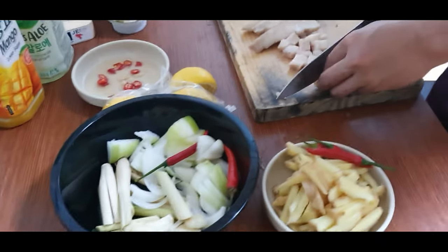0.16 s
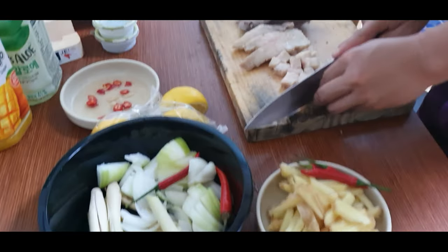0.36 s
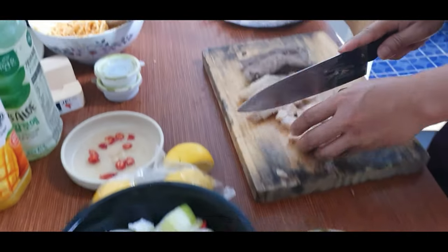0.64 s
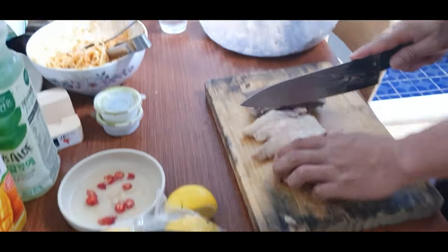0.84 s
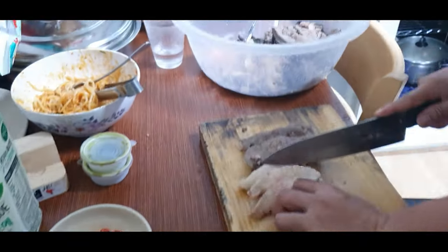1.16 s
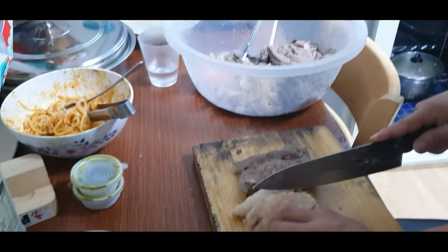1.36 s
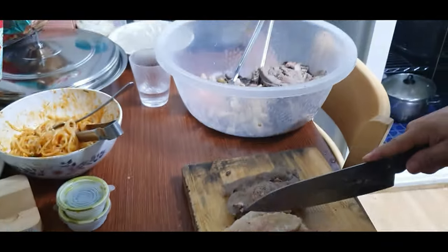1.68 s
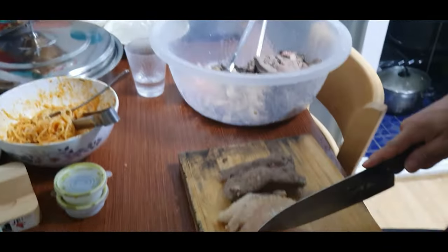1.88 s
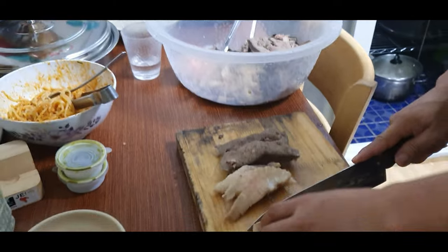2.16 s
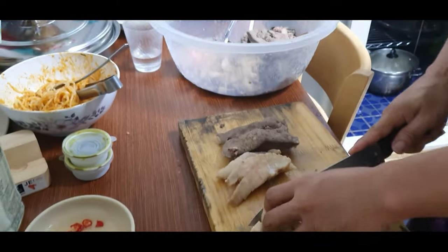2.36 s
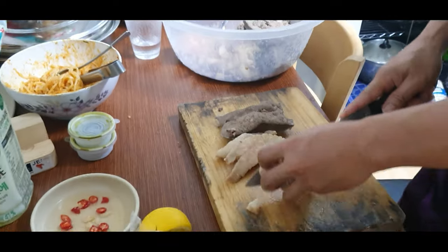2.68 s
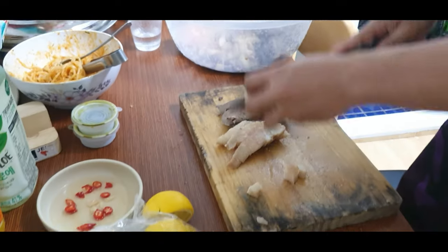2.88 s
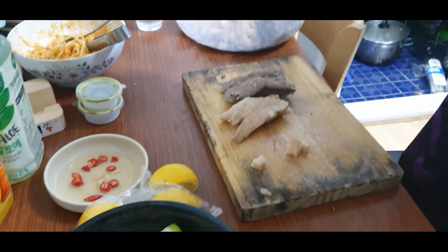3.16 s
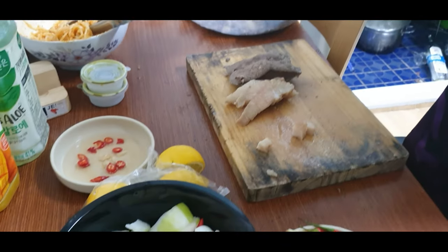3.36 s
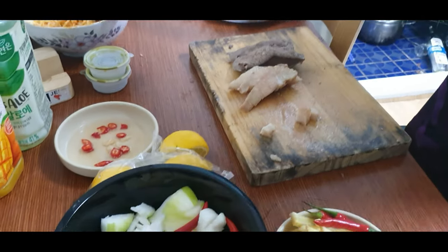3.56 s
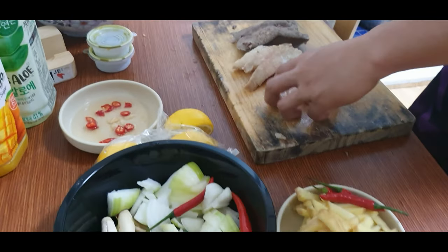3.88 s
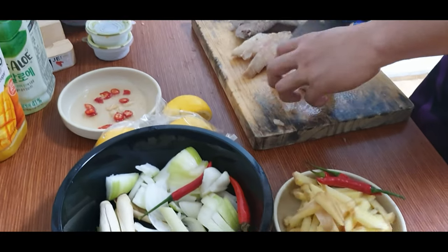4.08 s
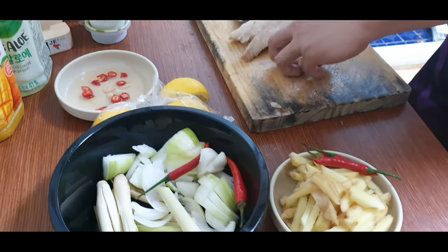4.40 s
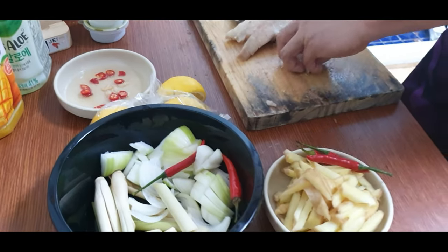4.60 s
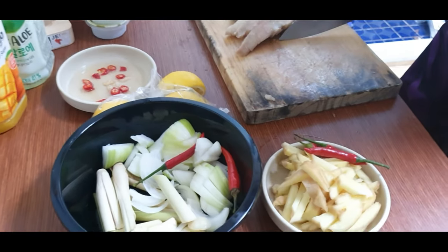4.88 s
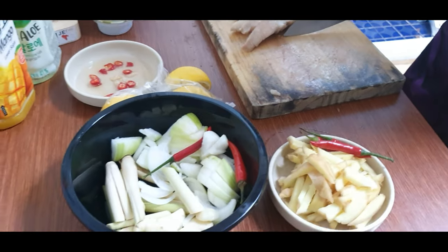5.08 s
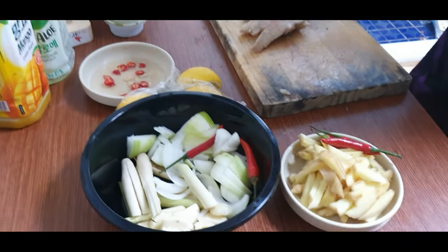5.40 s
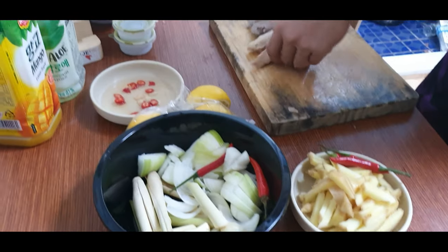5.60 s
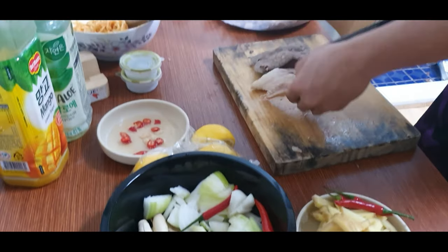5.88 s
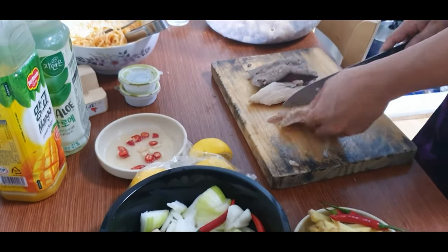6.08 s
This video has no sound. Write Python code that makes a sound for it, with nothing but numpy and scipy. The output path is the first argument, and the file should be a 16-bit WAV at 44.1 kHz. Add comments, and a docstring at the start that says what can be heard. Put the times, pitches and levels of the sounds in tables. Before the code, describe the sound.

Close stereo capture in a hard-walled kitchen with a steady low refrigerator hum and soft room air. A bright blade tap leads into one heavy, woody chop, followed by a short metallic drag and a soft slide. Afterwards come sparse steel taps, faint treble rustles and dull knocks, the later taps brighter and more echoing.

```python
"""Close in a hard-walled kitchen a refrigerator hums throughout, over room air and a faint narrow whine.
Bright blade taps come first, then one heavy chop on a wooden board, a drag of the blade and a soft slide;
room noise swells around the chop. Faint treble rustles, a second slide, dull knocks and taps follow.
Taps are echo clouds of coloured noise, knocks add ringing board modes, drag and slides are resonant noise;
the refrigerator is a set of wavering sines, the rustles, the air and the whine are filtered noise."""
import sys
import numpy as np
from scipy import signal
from scipy.fft import rfft, irfft
from scipy.io import wavfile

SR = 44100
rng = np.random.default_rng(int(sys.argv[2]) if len(sys.argv) > 2 else 0)


def waveform_to_disk(signal):
    """Save audio, clipped to [-1, 1], as 16-bit WAV at the path in sys.argv[1]."""
    frames = np.transpose(np.atleast_2d(signal))
    scaled = np.clip(frames, -1, 1) * 32767
    samples = np.round(scaled).astype(np.int16)
    wavfile.write(sys.argv[1], SR, samples)


N = 275184
EVENT_SIZE = 16384   # samples kept of each tap, knock or rustle


def from_db(db):
    """Decibels to gain."""
    return 10 ** (np.asarray(db) / 20)


def in_time(rows):
    """Columns of a curve table, joined by straight lines, at every sample."""
    s, *columns = np.transpose(rows)
    return [np.interp(np.arange(N) / SR, s, column) for column in columns]


def at_hz(points, hz):
    """A spectrum table read on a log-frequency axis."""
    table_hz, values = np.array(points).T
    return np.interp(np.log(hz), np.log(table_hz), values)


def drift(rate_hz):
    """Random wander: straight lines between normal draws of spread 1, rate_hz draws a second."""
    knots = rng.standard_normal(int(N / SR * rate_hz) + 2)
    return np.interp(np.arange(N) * rate_hz / SR, np.arange(len(knots)), knots)


def split(x, centres_hz):
    """Overlapping frequency slices of x that add up to x."""
    hz, spectrum = np.maximum(np.fft.rfftfreq(N, 1 / SR), 1), rfft(x)
    return [irfft(spectrum * at_hz(list(zip(centres_hz, one)), hz), N) for one in np.eye(len(centres_hz))]


def humps(rings, hz, lift_db):
    """Power gain of resonances on a flat base; lift_db raises every ring's tabled level."""
    gain = 1
    for centre_hz, width_hz, db in rings:
        gain = gain + from_db(2 * (db + lift_db)) / (1 + (2 * (hz - centre_hz) / width_hz) ** 2)
    return gain


def diffuse(size, gain_at):
    """Stereo noise from all sides at rms 1, coloured by gain_at(Hz), its channels alike by frequency."""
    # likeness of the two microphones' noise: hz, correlation (1 alike, 0 unlike, -1 opposed)
    likeness = [(60, 0.8), (120, 1), (240, 0.45), (480, 0.26), (950, -0.56), (1890, -0.22), (3770, 0.071),
                (7520, 0.056), (15000, -0.057)]
    # balance of the microphones: hz, left_right_db
    balance = [(100, 2), (500, -1), (1500, 2), (3000, 5), (5000, 8.5), (8000, 5), (15000, 0)]
    hz = np.maximum(np.fft.rfftfreq(size, 1 / SR), 1)
    alike = np.clip(at_hz(likeness, hz), -1, 1)
    mid, side = rfft(rng.standard_normal((2, size))) * gain_at(hz)
    pair = np.sqrt(1 + alike) * mid + np.sqrt(1 - alike) * side * [[1], [-1]]
    noise = irfft(pair * from_db(at_hz(balance, hz) * [[.5], [-.5]]), size)
    return noise / np.sqrt(np.mean(noise ** 2))


def echo(build_s, hold_s, t60_s):
    """The room fills, holds while early echoes arrive, then dies away by 60 dB in t60_s."""
    t = np.arange(EVENT_SIZE) / SR
    return (1 - np.exp(-t / build_s)) ** 2 * from_db(-60 * np.maximum(t - hold_s, 0) / t60_s)


def pan(left_right_db):
    """Gains of left and right, half the level difference each."""
    return from_db([[left_right_db / 2], [-left_right_db / 2]])


def add(out, start_s, sound, left_right_db):
    """Lays a stereo sound into out at start_s."""
    at = round(start_s * SR)
    out[:, at:at + sound.shape[1]] += (sound * pan(left_right_db))[:, :N - at]


def knocks():
    """A blow swings the air, the board's modes ring briefly and the room carries a dull colour on."""
    # dull knocks on the board, some in close succession:
    # start_s, echo_level_db, ring_db (blow and modes over the echo), tilt_db_per_octave
    blows = [(.413, -29, -14, -1.5), (.423, -27.5, 2, -6), (0.429, -17.5, 2.5, -1.2), (.44, -26, 3.5, -0.5),
             (.467, -40, 0, -8), (.51, -35.5, -0.5, 6), (.617, -33, -3, 4.5), (0.837, -47.5, 3, -8.5),
             (0.873, -48, 7, 4), (1.0445, -47, -5, -0.6), (1.513, -50.5, -3, -7), (1.659, -48, 1, -7),
             (1.69, -48, -4.5, -8.5), (2.119, -57, -1, -12), (2.449, -52, -9, 5.5), (2.999, -55, -4, 8),
             (3.858, -54.5, -3, -3), (4.418, -43, -10, -9.5), (4.449, -52, -5, -7),
             (5.114, -48.5, -9, -2.5), (5.499, -47.5, -9, -10.5), (5.976, -46.5, -6, 8),
             (6.233, -40.5, -2.5, -3)]
    # modes of the board before the knock's tilt and random spread: pitch_hz, level_db, t60_s
    modes = [(103, -18, 0.055), (209, -10, 0.08), (307, -4.5, 0.2), (389, -8, 0.031), (503, -8, 0.25),
             (583, -24, 0.26), (723, -5, 0.17), (814, 5.5, 0.032), (897, -8, 0.14), (1090, 2, 0.046),
             (1240, -28, .08), (2273, -15, 0.071)]
    # spectrum of the knock's echo before tilt: hz, relative_db (per Hz)
    room_colour = [(60, -27), (120, -22), (250, -10), (480, -7), (722, -4), (950, -6.5), (1250, -9),
                   (1870, -21.5), (2400, -27.5), (5000, -43), (9000, -54)]
    contact_s, contact_db = 0.0004, 9   # width of the swing; peak on the modes' level scale
    out, t = np.zeros((2, N)), np.arange(EVENT_SIZE) / SR
    mode_hz, mode_db, t60_s = np.transpose(modes)[:, :, None]
    swing = (t - 2.49 * contact_s) / contact_s
    contact = from_db(contact_db) * (swing ** 2 - 1) * np.exp(-swing ** 2 / 2)
    lead_s = 0.00034 * np.array([[[0]], [[1]]])   # the modes run ahead in phase on the right
    onset = echo(0.00031, 1, 1)   # held past the event's end, so only the build-up acts
    room_decay = echo(0.0021, 0.0082, 0.33)
    for start_s, level_db, ring_db, tilt_db in blows:
        spread_db = rng.normal(0, 2.2, (len(modes), 1))
        strength = from_db(mode_db + tilt_db * np.log2(mode_hz / 600) + spread_db)
        modes_swing = np.sin(2 * np.pi * mode_hz * (t + lead_s))
        ringing = (strength * modes_swing * from_db(-60 * t / t60_s)).sum(axis=1)

        def colour(hz):
            octaves = np.log2(np.clip(hz, 80, 3000) / 600)
            return from_db(at_hz(room_colour, hz) + tilt_db * octaves)
        direct = from_db(ring_db) * (contact + onset * ringing)
        room = room_decay * diffuse(EVENT_SIZE, colour)
        add(out, start_s, from_db(level_db) * (direct + room), left_right_db=0.2)
    return out


def taps():
    """A short direct click with a ragged cloud of echoes coloured by the blade; each tap has its own dullness."""
    # bright blade taps: start_s, echo_level_db, click_db (over the echo), dullness_db_per_octave,
    # ring_hz (a ring of its own), left_right_db
    tap_rows = [(0.3404, -39, 8, -0.3, 2880, -1.7), (0.4249, -39, 17.5, 0.5, 2380, -2.5),
                (0.831, -47.5, 11, 9.5, 1880, 0.5), (0.882, -52.5, 20, 21, 1230, 2),
                (1.0043, -65.5, 25.5, 18, 1700, 11), (1.044, -60.5, 25.5, 21, 1820, 10.5),
                (1.37, -41.5, 15, 1.4, 2750, 0), (1.6621, -41.5, 8, 5.5, 2020, -1),
                (1.867, -38.5, 10.5, 1.3, 2840, -0.5), (2.4424, -58.5, 19, 4.5, 2200, 0),
                (2.884, -50.5, 16.5, 8, 2900, 0), (3.691, -34.5, 0, 1, 2400, -0.5),
                (5.03, -33, -1.5, 0.8, 2610, -0.5), (5.112, -41.5, 16, 7.5, 1570, -0.6),
                (5.478, -32.5, 9, 0.6, 2730, -1.2), (5.975, -47, 16, 4.5, 1540, -1.5)]
    # spectrum of the taps under the rings: hz, relative_db (per Hz)
    tap_colour = [(300, -49), (500, -14.5), (1000, -10), (1250, -4.5), (1820, -5.5), (2760, -4.5),
                  (3650, -12), (4700, -10), (5400, -14.5), (6930, -14), (8360, -23), (10400, -19),
                  (15500, -25.5)]
    # rings of the blade before lift and random spread: centre_hz, width_hz, level_db
    blade = [(1470, 74, -26), (2290, 55, -1.5), (2890, 180, -3), (4740, 120, -2), (4090, 200, -2),
             (5860, 260, -3), (7000, 250, -5), (9900, 300, -5.5)]
    # lows and the tap's own ring grow with dullness: dB per (dB per octave), and dB at zero dullness
    lows_per_dull, lows_db, ring_per_dull, ring_base_db = 0.55, -0.95, 0.7, 1
    out = np.zeros((2, N))
    for start_s, level_db, click_db, dull_db, ring_hz, left_right_db in tap_rows:
        # ring levels vary slightly at random from tap to tap
        rings = np.array(blade) + rng.normal(0, 0.41, (len(blade), 1)) * [0, 0, 1]
        rings = [*rings, (ring_hz, 0.05 * ring_hz, ring_base_db + ring_per_dull * dull_db)]

        def colour(hz):
            octaves = np.log2(hz / 3000)
            treble_db = -dull_db * np.maximum(octaves, 0)
            bass_db = (lows_db + lows_per_dull * dull_db) * np.clip(-octaves, 0, 2.5)
            return from_db(at_hz(tap_colour, hz) + treble_db + bass_db) * np.sqrt(humps(rings, hz, lift_db=5.0))

        def click_colour(hz):
            return colour(hz) / (1 + (hz / 5000) ** 2)   # the click is softer in the treble
        # level wander of the cloud, one draw every 200 samples
        wander = np.interp(np.arange(EVENT_SIZE) / 200, np.arange(83), rng.standard_normal(83))
        cloud = from_db(1.5 * wander) * echo(0.0022, 0.019, 0.3) * diffuse(EVENT_SIZE, colour)
        click = from_db(click_db) * echo(0.0012, 0, 0.025) * diffuse(EVENT_SIZE, click_colour)
        add(out, start_s, from_db(level_db) * (cloud + click), left_right_db)
    return out


def drag():
    """Friction in the resonances of blade and board; each range stutters on its own as the edge catches."""
    # level of the blade dragged over the wood: time_s, steel_level_db
    drag_level = [(0.555, -68), (0.575, -45), (0.603, -34), (0.617, -27), (0.639, -33.5), (0.687, -33.5),
                  (0.707, -39), (0.8, -56.5), (0.94, -83)]
    # spectrum of the rub under the rings: hz, relative_db (per Hz)
    drag_colour = [(300, -13), (700, -13), (1200, -3.5), (2000, -6), (3500, -11.5), (5500, -20.5),
                   (9000, -31), (15500, -35.5)]
    # rings of blade and board before lift: centre_hz, width_hz, level_db
    drag_rings = [(720, 68, 10.5), (1159, 30, 7.5), (1590, 41, -4), (2450, 68, -3), (3200, 56, 0),
                  (3516, 64, 2), (4840, 63, -3), (5400, 91, -1), (5850, 48, -4)]
    board_db, grains_hz = -0.8, 1200   # board over steel; rate of fine catches of the edge
    steel_db, = in_time([(drag_level[0][0] - .05, -95), *drag_level])

    def colour(hz):
        return from_db(at_hz(drag_colour, hz)) * np.sqrt(humps(drag_rings, hz, lift_db=9.0))
    low, middle, *steel_bands = split(diffuse(N, colour), [800, 1300, 2200, 3500, 5500, 9000])
    catches = [from_db(3.0 * drift(90)) for _ in range(6)]
    board = from_db(steel_db + board_db) * (low * catches[0] + middle * catches[1]) * pan(3)
    grains = from_db(steel_db + 1.1 * drift(grains_hz))
    steel = grains * sum(band * catch for band, catch in zip(steel_bands, catches[2:]))
    return board + steel


def slide():
    """Soft friction heard mainly in a few resonances; each stroke rises fast, holds and fades."""
    # blade sliding softly: start_s, length_s, level_db
    strokes = [(1.05, 0.35, -59), (3.084, 0.054, -64)]
    # rings of the slide before lift: centre_hz, width_hz, level_db
    slide_rings = [(1240, 140, -5), (2090, 170, 1.5), (2830, 76, -1.5)]
    rise_db_per_s, fall_db_per_s = 500, 164
    t, level = np.arange(N) / SR, 0
    for start_s, length_s, db in strokes:
        before_db = rise_db_per_s * np.maximum(start_s - t, 0)
        after_db = fall_db_per_s * np.maximum(t - start_s - length_s, 0)
        level = level + from_db(db - before_db - after_db)
    rub = diffuse(N, lambda hz: np.sqrt(humps(slide_rings, hz, lift_db=20)) / (1 + (hz / 4000) ** 4))
    return level * from_db(4.8 * drift(40.14)) * rub * pan(3)


def rustles():
    """Treble puffs of noise that start at once and die away."""
    # faint treble rustles, the first two around the chop: start_s, level_db (at the start), t60_s
    rustle_rows = [(.404, -45, 0.32), (.42, -44, .25), (1.066, -61.5, 0.2), (1.227, -61.5, 0.34),
                   (3.1, -55, 0.051), (3.265, -64.5, .05), (3.553, -56, 0.42), (4.64, -68, 0.067),
                   (5.75, -66, .1)]
    # spectrum of the rustles: hz, relative_db (per Hz)
    rustle_colour = [(3000, -9), (7000, -8), (11000, -4), (15500, -4.5)]
    out = np.zeros((2, N))
    for start_s, level_db, t60_s in rustle_rows:
        puff = diffuse(EVENT_SIZE, lambda hz: from_db(at_hz(rustle_colour, hz)))
        add(out, start_s, from_db(level_db) * echo(.001, 0, t60_s) * puff, left_right_db=.3)
    return out


def refrigerator():
    """Compressor lines; standing waves give each its own balance and lag between the microphones."""
    # steady lines: pitch_hz, level_db (rms), left_right_db, left_lead_rad, waver_db
    lines = [(32.6, -51, 0, .12, 1.5), (57.45, -41.8, .3, .06, .6), (114.9, -53.5, .5, .03, 1.5),
             (143, -66, 0, 0, 1.8), (172.4, -63, 0, -.3, 1.8), (240, -70, 5, 0, 1.5),
             (276, -73, -5, 0, 1.5), (287.3, -69, -4, 0, 1.5), (402.2, -73, 4, -2.5, 1.5),
             (459.6, -72, 3, 1.5, 1.5)]
    # the sixth line shifts sideways as the microphones turn in its standing wave: time_s, left_right_db
    sixth_shift = [(0, 5), (.7, 0), (2.7, 1.5), (3.5, 5.5), (5, 7.5), (6.24, 9.5)]
    sixth_hz, sixth_db, sixth_lead_rad = 344.7, -57, 2.35   # level is rms when centred; left leads
    left_share = 0.7   # share of the shift that the left side gains
    t = np.arange(N) / SR

    def line(hz, lead_rad):
        phase = 2 * np.pi * (hz * t + rng.random()) + np.array([[lead_rad], [0]])
        return np.sqrt(2) * np.sin(phase)   # rms 1
    shift_db, = in_time(sixth_shift)
    side_db = np.array([[left_share], [left_share - 1]]) * shift_db
    out = from_db(sixth_db + side_db + 0.88 * drift(2.46)) * line(sixth_hz, sixth_lead_rad)
    for hz, db, left_right_db, lead_rad, waver_db in lines:
        out = out + from_db(db + waver_db * drift(2.32)) * pan(left_right_db) * line(hz, lead_rad)
    return out


def air():
    """Room noise with steady bass; the part above it changes slowly in level and tilt."""
    # room noise above the bass, swelling around the heavy chop: time_s, level_db, tilt_db_per_octave
    swell = [(0.0, -47.5, 1.6), (0.22, -43.5, 2), (0.4, -37, 0), (0.53, -32, -2.5), (0.82, -44.5, 0),
             (1.37, -46, 0.36), (2.28, -48, 0.66), (3.42, -50, 0.9), (6.24, -49.5, 0.5)]
    # spectrum of the air before the swell: hz, relative_db (per Hz)
    air_colour = [(20, -4.5), (35, -8), (70, 4.5), (110, 0), (160, 2), (220, -9.5), (320, -11),
                  (450, -15.5), (900, -17.5), (1700, -25.5), (3200, -31), (5500, -40), (8500, -45.5),
                  (15500, -50.5)]
    # room resonances: centre_hz, width_hz, level_db (over the air)
    air_rings = [(715, 410, 1), (1270, 63, 4.5), (2000, 480, -0.3), (2750, 410, 2)]
    level_db, tilt_db = in_time(swell)

    def colour(hz):
        return from_db(at_hz(air_colour, hz)) * np.sqrt(humps(air_rings, hz, lift_db=0))
    bass, *bands = split(diffuse(N, colour), [150, 600, 2400, 9600])
    out = from_db(-55.5) * bass
    for k, band in enumerate(bands):   # bands lie two octaves apart
        out = out + from_db(level_db + 2 * k * tilt_db + 0.23 * drift(4.1)) * band
    return out


def whine():
    """Noise squeezed into one narrow band."""
    # a faint narrow whine: time_s, level_db
    whine_level = [(0, -77.5), (3.4, -74.5), (4, -79), (6.24, -77.5)]
    centre_hz, width_hz = 4330, 170
    level_db, = in_time(whine_level)
    narrow = diffuse(N, lambda hz: 1 / (1 + (2 * (hz - centre_hz) / width_hz) ** 2))
    return from_db(level_db + 2.0 * drift(4.7)) * narrow


def scene():
    """All sources, knife first and room last."""
    knife = knocks() + taps() + drag() + slide()
    return knife + rustles() + refrigerator() + air() + whine()


def record(dry):
    """A steep low-pass cuts the top above 16 kHz."""
    return signal.sosfilt(signal.cheby2(20, 70, 16000, fs=SR, output="sos"), dry)


dry = scene()
out = record(dry)
waveform_to_disk(out)
```